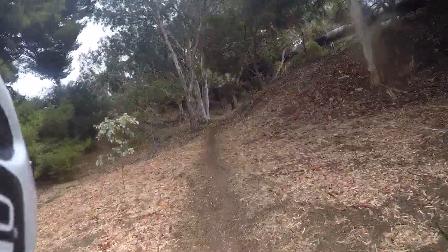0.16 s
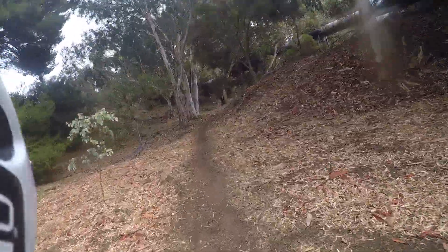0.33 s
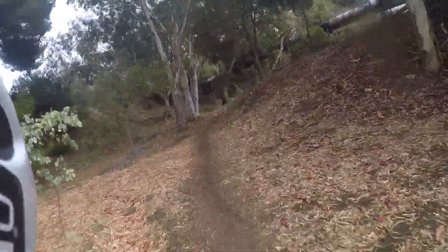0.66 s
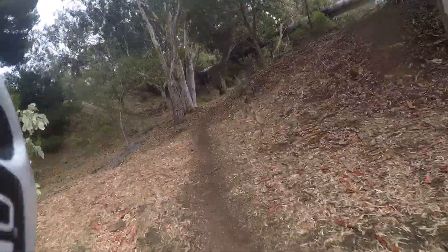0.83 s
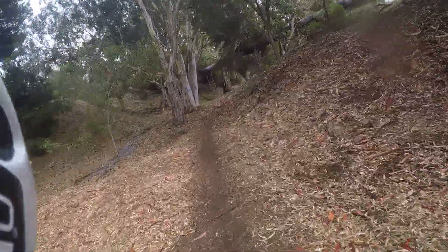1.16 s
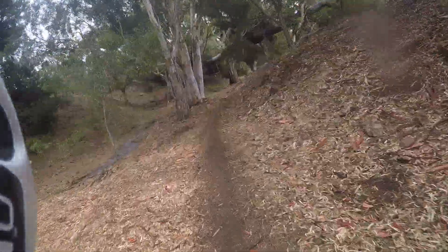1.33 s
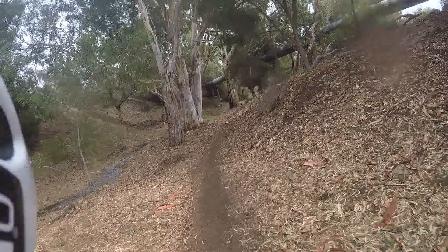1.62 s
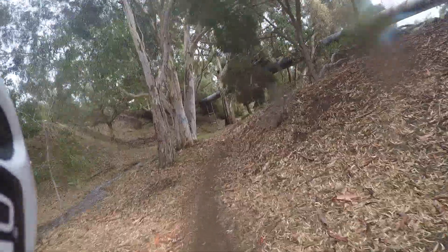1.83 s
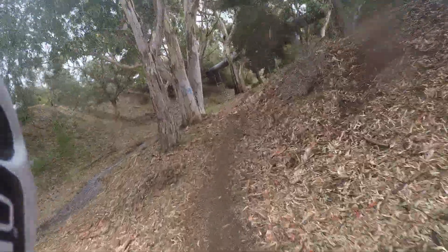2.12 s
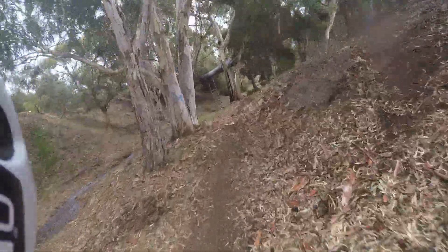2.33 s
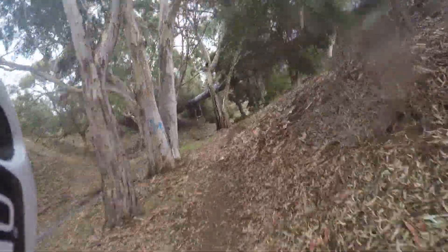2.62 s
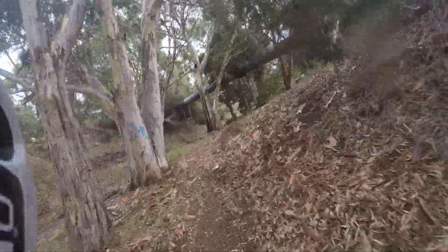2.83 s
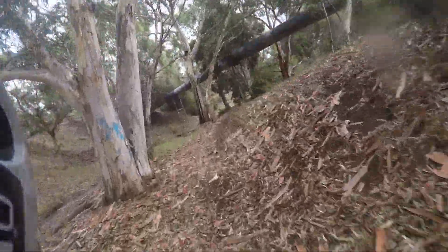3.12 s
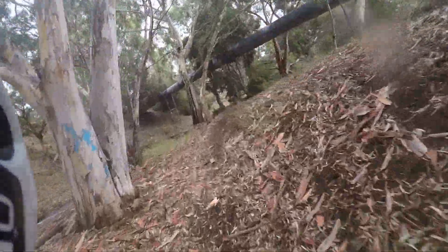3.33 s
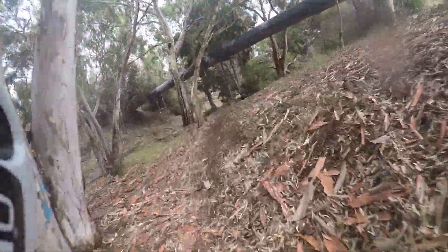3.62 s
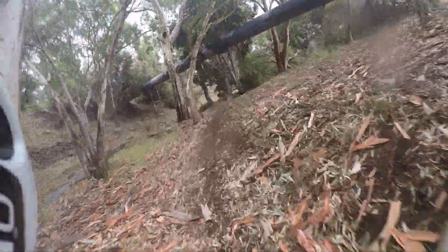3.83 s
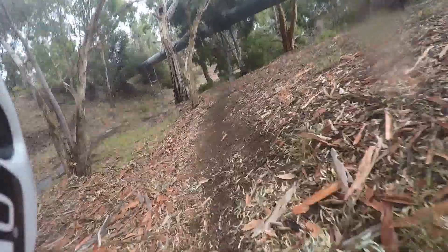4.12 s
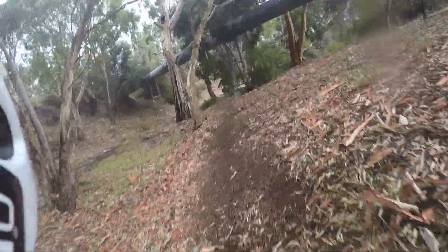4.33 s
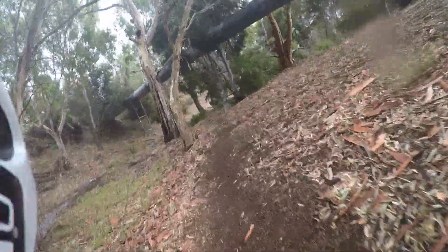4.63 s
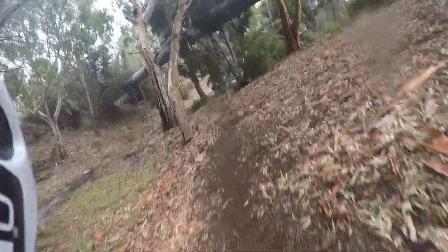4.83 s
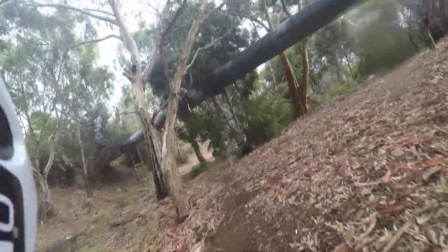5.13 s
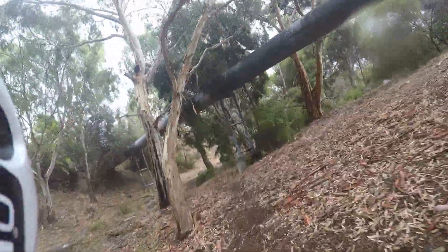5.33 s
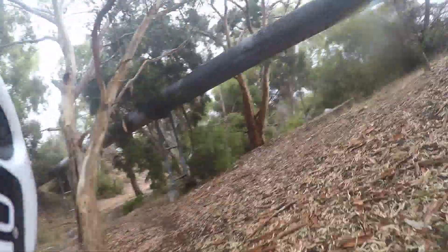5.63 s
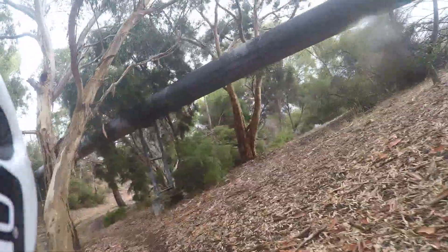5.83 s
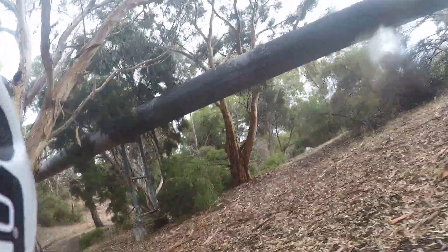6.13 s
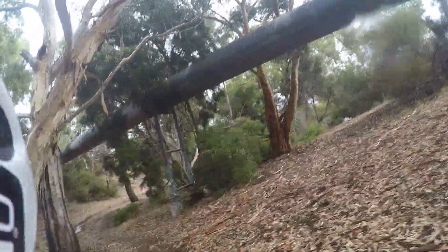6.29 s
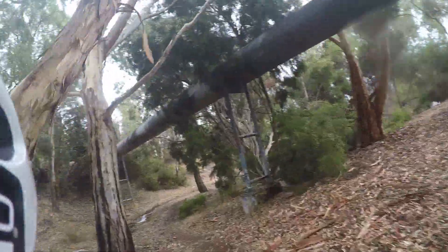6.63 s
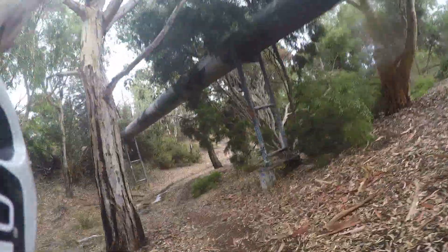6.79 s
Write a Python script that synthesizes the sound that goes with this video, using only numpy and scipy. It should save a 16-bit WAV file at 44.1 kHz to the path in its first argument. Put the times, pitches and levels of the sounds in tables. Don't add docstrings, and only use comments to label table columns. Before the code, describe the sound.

Close, muffled helmet microphone on a bicycle descending a leaf-covered dirt trail. Tyres crush dry leaves with a grainy, swelling hiss over low rumble; sticks knock and loose parts tick. A sharp bark snap with a brief metallic ring comes early. Wind buffeting grows to heavy thumps, then the crunch thins away, leaving wind, faint scuffs and distant birds. Small clicks recur steadily throughout.

```python
import sys
import numpy as np
from scipy import signal
from scipy.fft import rfft, irfft, next_fast_len
from scipy.io import wavfile
from scipy.ndimage import uniform_filter1d

SR = 44100
rng = np.random.default_rng(int(sys.argv[2]) if len(sys.argv) > 2 else 0)


def wrap_up_sound(samples):
    columns = np.atleast_2d(samples).T
    tamed = np.clip(columns, -1, 1)
    steps = np.round(tamed * 32767).astype(np.int16)
    wavfile.write(sys.argv[1], SR, steps)


def rack_gain(trim_db):
    fader = np.asarray(trim_db, float)
    return 10 ** (fader / 20)


N = 306931

# (frequency [Hz], bandwidth [Hz], level [dB])
HOUSING_MODES = [(830, 310, -20), (1178, 135, -6), (1458, 200, -9.5), (1850, 215, -1), (2517, 273, -2),
                 (2920, 174, 2), (3216, 346, -2), (3750, 290, -6.5), (4280, 290, -15.5)]
BRIGHT_MODES = [(5750, 420, 0.5), (6200, 75, -11), (6450, 58, -8.5), (7580, 340, -2.5), (9250, 1000, -17.5),
                (11500, 850, -14.5), (14500, 1800, -20.5)]

# (frequency [Hz], density [dB per Hz])
BUFFET_SPECTRUM = [(4.7, -10), (8.0, 2), (22, 1), (40, -11.5), (52, -31), (88, -120)]
FLUTTER_SPECTRUM = [(25, -33), (38, 2), (46, 2.5), (56, 1.5), (63, -5), (72, -15.5), (85, -29), (110, -69)]
# (time [s], buffeting level [dB])
AIRFLOW = [(0, -44), (.7, -41.5), (1.5, -37.5), (2.5, -37), (3.2, -33.5), (4.0, -32), (4.7, -26),
           (5.1, -35.5), (5.65, -26), (6.1, -36), (6.96, -38)]
# (time [s], peak buffeting [dB], peak flutter [dB])
GUSTS = [(.05, -53, -33), (0.237, -25.5, -30), (.4, -31, -55), (.57, -28.5, -40), (1.01, -55, -38.5),
         (1.3, -32, -38), (1.57, -50, -34), (1.68, -33, -48), (1.78, -31.5, -35.5), (1.92, -28.5, -32.5),
         (2.11, -28, -45), (2.28, -56, -36.5), (2.7, -52, -38), (2.81, -25, -43), (2.94, -28, -32),
         (3.22, -50, -34), (3.39, -35, -32), (3.57, -29.5, -43), (3.83, -32, -36.5), (4.07, -31.5, -34),
         (4.19, -45, -36), (4.28, -21, -27), (4.48, -31, -40), (4.75, -33, -35), (4.89, -28, -37.5),
         (5.24, -31.5, -36.5), (5.32, -26.5, -43), (5.52, -27.5, -44), (5.85, -23.5, -37),
         (6.16, -32.5, -36.5), (6.33, -25.5, -32.5), (6.53, -33.5, -33.5), (6.72, -32.5, -37.5),
         (6.84, -31.5, -64)]
GUST_RISE_DB_PER_S, GUST_FALL_DB_PER_S = 136, 113
FLUTTER_DB, FLUTTER_FOLLOWS = -45.5, 0.63
# (time [s], peak level [dB], pitch [Hz])
EDDIES = [(0.614, -21.5, 31.2), (4.076, -14, 32.2), (4.158, -22, 36.3), (4.473, -15.5, 35),
          (4.547, -27, 30), (4.616, -24, 32.3), (4.723, -15.5, 29.4), (4.836, -18.5, 30)]
EDDY_CYCLES = 0.54

# (frequency [Hz], density [dB per Hz])
DEEP_SPECTRUM = [(50, -39), (85, -0.5), (107, -5), (280, -20), (360, -69), (620, -120)]
GRIT_SPECTRUM = [(150, -3.5), (260, -2), (494, -5.5), (674, -8), (794, -4), (1000, -11.5), (1300, -31),
                 (2200, -120)]
# (time [s], deep rumble level [dB])
ROLLING = [(0, -54), (.6, -53), (1.05, -53), (1.32, -53.5), (1.75, -52), (2.4, -51), (2.85, -54.5),
           (3.3, -55.5), (5.0, -63.5), (5.6, -65), (6.2, -61.5), (6.6, -64.5), (6.96, -68)]
GRIT_DB, GRIT_FOLLOWS = -61.5, 0.71
# (time [s], peak rumble level [dB])
JOLTS = [(.44, -48), (.66, -50), (.81, -56), (1.22, -50), (1.3, -48.5), (1.86, -48), (1.98, -59),
         (2.15, -49), (2.3, -49), (2.53, -59), (2.62, -53), (2.74, -44.5), (2.84, -48), (2.92, -61),
         (3.1, -48), (3.6, -53), (4.02, -52), (4.24, -50), (4.6, -64), (4.84, -59), (5.15, -60),
         (5.32, -58), (5.78, -63), (5.95, -60), (6.64, -60), (6.79, -65)]
JOLT_RISE_DB_PER_S, JOLT_FALL_DB_PER_S = 400, 204
# (time [s], crush hiss level [dB])
LITTER = [(0, -49), (.4, -48), (.62, -47), (.78, -46), (1.05, -43), (1.58, -42), (1.66, -46), (1.93, -48.5),
          (2.05, -42), (2.27, -40.5), (2.79, -45), (2.86, -47.5), (3.26, -51), (3.42, -44.5), (4.12, -49),
          (4.65, -57.5), (5.7, -71.5), (6.96, -71)]
# (time [s], change [dB])
PATCHES = [(.11, 1.5), (.16, 2), (.25, -1.5), (.42, -5.5), (.46, 5), (.53, 1), (0.599, 8), (.615, -6.5),
           (.68, 5), (.8, -7), (.875, -1.5), (1.05, 2), (1.1, -1), (1.19, 2.5), (1.225, -4), (1.255, 2),
           (1.39, 1.5), (1.45, -0.5), (1.64, -6), (1.69, 2), (1.75, 2), (1.79, -5.5), (1.82, 1),
           (2.01, -4.5), (2.14, 1), (2.21, 2), (2.27, 1.5), (2.665, 3), (2.7, -0.5), (2.79, 2),
           (2.84, -4.5), (2.96, 3.5), (3.03, 2.5), (3.14, 7), (3.21, 2), (3.25, 0), (3.3, -6), (3.39, -4),
           (3.46, 4), (3.76, 2), (3.79, -2), (3.83, 0.5), (3.88, -3), (4.15, -1), (4.2, -3), (4.35, 2),
           (4.62, -3.5), (4.71, 6.5), (4.81, 2), (4.91, 3), (4.98, 8), (5.04, -16), (5.27, 6.5), (5.62, 5),
           (5.94, -3), (6.02, 9), (6.37, 10), (6.42, 7), (6.66, 11), (6.87, 13)]
PATCH_S = 0.017
BRIGHTER_PER_DB, DULLEST_DB = 0.88, -49
# (time [s], level [dB])
RUSTLE = [(0, -71), (.5, -72.5), (1.2, -67), (1.7, -70), (2.2, -64.5), (3.3, -74), (3.55, -65), (3.85, -64),
          (4.3, -64.5), (4.9, -71.5), (6.96, -83)]
JINGLE_DB, JINGLE_RISE_DB_PER_S, JINGLE_FALL_DB_PER_S = -20, 400, 220

# (time [s], level [dB], centre frequency [Hz])
KNOCKS = [(.145, -31, 2500), (0.17, -30.5, 1800), (.193, -33, 1840), (0.219, -37, 2200),
          (0.278, -33.5, 2900), (0.313, -31.5, 2920), (.344, -33.5, 3000), (.412, -34, 2880),
          (.623, -28.5, 2500), (.644, -48, 3100), (0.669, -24, 1380), (0.807, -37, 2850),
          (0.884, -30.5, 2500), (1.24, -30, 2720), (1.784, -44, 2950), (1.875, -38, 1680),
          (1.992, -33, 1850), (2.018, -48, 2950), (2.087, -47, 2930), (2.376, -32, 3080),
          (2.668, -27.5, 2920), (2.74, -55, 2920), (2.752, -35, 2500), (2.878, -46, 2460),
          (3.117, -40, 3000), (3.175, -36, 1850), (3.304, -37.5, 2900), (3.377, -34, 2620),
          (3.4, -37, 2830), (3.426, -37, 2480), (3.459, -38, 2900), (3.744, -37, 2000), (3.98, -42, 2200),
          (4.13, -31, 3230), (4.262, -33, 1180), (4.31, -34, 1150), (4.59, -42, 2630), (4.826, -42, 1830),
          (5.063, -49, 1640), (5.373, -51, 1890), (5.658, -52, 2500), (5.768, -48, 2900),
          (5.797, -57, 3100), (6.111, -48, 2180), (6.349, -39, 1300), (6.523, -46, 1500),
          (6.564, -46, 1600)]
KNOCK_TOP_DB = -26
# (time [s], body level [dB], bright level [dB], tilt [dB per octave])
TICKS = [(0.048, -51, -53, 1), (.056, -43, -54, 1), (.082, -51, -51, 1), (.646, -58, -50, 1),
         (.68, -38, -30, 1), (.686, -36, -40, 1), (0.72, -26.5, -34, 9), (1.123, -54, -42.5, -3),
         (1.292, -67, -53, -1), (1.331, -50, -52.5, -1), (2.98, -60, -51, 1), (3.409, -47, -49, -3),
         (3.426, -53, -52, 7), (3.457, -55, -56, -4), (3.532, -55, -52, 2), (3.542, -40, -39, 3),
         (3.548, -55, -50, -3), (3.559, -49, -45, 1), (3.566, -41, -45, -4), (3.573, -50, -39.5, -1),
         (3.581, -51, -49, 6), (3.59, -55, -52, 1), (3.659, -57, -46, 1), (3.667, -42, -45, 2),
         (3.695, -55, -51, 1), (3.708, -38, -44, 2), (3.721, -59, -50, -1), (3.738, -53, -50, 1),
         (3.745, -43, -44, 4), (3.764, -53, -47, -4), (3.95, -38, -39, 3), (3.97, -55, -53, 1),
         (3.982, -55, -58, 3), (4.095, -37.5, -42.5, 1), (4.135, -56, -41, -2), (4.17, -55, -58, -3),
         (4.215, -55, -49, 5), (4.235, -58, -52, 2), (4.251, -55, -45, 2), (4.259, -45, -41, 4),
         (4.272, -56, -44, 2), (4.353, -51, -41.5, 2), (4.498, -53, -44, -4), (4.538, -58, -54, 1),
         (4.675, -63, -53, 1), (4.697, -51, -45, -1), (4.72, -63, -53, -6), (6.631, -70, -54, 3)]
TICK_HZ = 2500
# (time [s], level [dB])
BARK = [(.643, -72), (.648, -48), (.657, -46.5), (.669, -54), (0.672, -44), (.688, -43.5), (.697, -55.5),
        (.717, -48), (.721, -49), (.73, -59), (.75, -62), (.83, -86)]
# (frequency [Hz], density [dB per Hz])
BARK_SPECTRUM = [(410, -30), (1050, -16.5), (1400, -6.5), (2160, -16), (3360, -6.5), (5080, -30),
                 (5570, -33), (7500, -20), (8210, -26), (9800, -27), (15500, -39)]
# (time [s], length [s], start [Hz], end [Hz], level [dB])
SQUEAKS = [
    (.165, 0.086, 1840, 1777, -53),
    (.265, 0.061, 1870, 1900, -55),
    (.325, 0.055, 1863, 1896, -50),
    (1.805, 0.068, 1783, 1848, -47.5),
    (1.88, 0.023, 1850, 1950, -52),
]
# (time [s], level [dB])
SPOKE_WHIPS = [
    (0.6711, -33),
    (.7205, -44),
]
# (frequency [Hz], level [dB], decay by 60 dB [s])
SPOKE_MODES = [(1370, -0.5, 0.063), (2950, -21, .07), (3321, 1, 0.089), (3640, -6, .035), (3970, -5, 0.087),
               (4730, -13, .06), (5720, -9, .06), (7340, -10, 0.083), (7671, -9, 0.08), (9432, -14, 0.045)]
# (time [s], length [s], level [dB], centre frequency [Hz])
SCUFFS = [(4.263, 0.026, -48, 1390), (4.316, 0.037, -51.5, 1340), (4.501, 0.039, -58, 1350),
          (4.648, 0.059, -60.5, 1340), (5.726, 0.023, -55, 1100), (5.933, 0.016, -60.5, 1500),
          (6.008, .03, -66, 2200), (6.075, 0.01, -58, 2200), (6.088, 0.032, -50.5, 1850),
          (6.201, 0.036, -57, 1340)]
# (time [s], length [s], start [Hz], end [Hz], level [dB])
CHIRPS = [(2.89, .04, 6850, 6750, -67), (4.85, .02, 4450, 4750, -61), (4.868, .025, 4750, 4500, -66),
          (4.903, .035, 5400, 5050, -64), (5.53, 0.05, 5050, 5200, -71), (5.56, 0.057, 6900, 6700, -72),
          (5.752, .055, 4500, 4600, -68), (5.772, .022, 5700, 5800, -65), (5.778, 0.05, 5300, 5500, -64),
          (5.793, .022, 5900, 6850, -68), (5.812, .022, 6900, 6700, -66), (5.85, .085, 5350, 5150, -77),
          (5.925, .022, 5100, 5500, -70), (5.946, 0.028, 5500, 7000, -64), (5.968, .03, 7150, 7100, -65),
          (5.995, .012, 7000, 6600, -70), (6.01, .07, 6750, 6700, -78), (6.38, 0.022, 4600, 4850, -65),
          (6.425, .025, 4450, 4550, -70), (6.447, 0.02, 4700, 4730, -67), (6.776, .024, 4400, 4550, -63),
          (6.793, .02, 4550, 4850, -71), (6.81, .03, 5440, 5500, -72), (6.855, .045, 5500, 5350, -67),
          (6.855, .025, 4650, 4650, -68), (6.912, .03, 4600, 4800, -71), (6.927, .032, 5450, 5550, -69)]
# (frequency [Hz], density [dB per Hz])
HISS_SPECTRUM = [(530, -40), (900, -20), (1160, 6.5), (1320, 0.5), (1880, 1.5), (2170, -6), (2570, 0),
                 (5100, -8.5), (13000, -18.5), (16000, -12)]
HISS_DB = -62.5

LOSS_EVERY_S, RESTART_EVERY_S, RESTART_AT_S = .125147, 3.3373, 1.1244
JUMPS_DB = [-30, -43.5, -35.5, -70, -27, -47.5, -39, -48.5, -70, -70, -30.5, -70, -42, -40.5, -47.5, -33,
            -43.5, -31, -42.5, -36, -34, -47, -27.5, -37.5, -34, -40.5, -32, -24.5, -38.5, -28.5, -33.5,
            -70, -23, -31, -32.5, -41, -19.5, -28, -41, -16.5, -33.5, -30.5, -31, -32, -31, -43, -36, -26.5,
            -33, -33.5, -30, -34, -32, -32.5, -70, -28]
# (time [s], length [s], lowest loss [Hz])
TREBLE_LOSSES = [(.22, .03, 12800), (.3, .2, 14300), (1.35, .2, 14300), (4.04, .05, 12800),
                 (4.27, .04, 13500), (4.45, .03, 14000), (4.53, .05, 13000), (4.6, .09, 12800),
                 (4.85, .1, 13000), (4.98, .06, 12800), (5.15, .18, 12800), (5.39, .04, 13200),
                 (5.49, .33, 12800), (5.92, .04, 13500), (6.06, .03, 13000), (6.18, .03, 13000),
                 (6.27, .1, 12800), (6.47, .13, 12800), (6.68, .04, 13000), (6.8, .04, 12800),
                 (6.93, .03, 13500)]


def wind():
    buffet_db, flutter_db = wind_levels()
    buffet = coloured(BUFFET_SPECTRUM, .85, over_s=.07)
    flutter = coloured(FLUTTER_SPECTRUM, .8, over_s=.06)
    pressure = rack_gain(buffet_db) * buffet + rack_gain(flutter_db) * flutter + eddies()
    return .3 * np.tanh(pressure / .3)


def wind_levels():
    flow_db, = in_time(AIRFLOW)
    deep_db, = in_time(ROLLING)
    s, buffet_db, flutter_db = np.transpose(GUSTS)
    steady_db = FLUTTER_DB + FLUTTER_FOLLOWS * (deep_db - deep_db.mean())
    rates = GUST_RISE_DB_PER_S, GUST_FALL_DB_PER_S
    buffeting = flares(flow_db, s, buffet_db + 2.0, *rates)
    fluttering = flares(steady_db, s, flutter_db + 1, *rates)
    rounding = int(.025 * SR)
    return uniform_filter1d(buffeting, rounding), uniform_filter1d(fluttering, rounding)


def eddies():
    out = np.zeros(N)
    for s, db, hz in EDDIES:
        near = np.arange(int((s - .08) * SR), int((s + .08) * SR))
        turns = (near / SR - s) * hz
        out[near] -= rack_gain(db) * np.exp(-(turns / EDDY_CYCLES) ** 2) * np.cos(2 * np.pi * turns)
    return out


def tyres():
    rumble = ground_rumble()
    clumps_db = 1.3 * drift(41.0)
    return rumble + litter_crush(clumps_db) + leaf_snaps(clumps_db)


def ground_rumble():
    deep_db, = in_time(ROLLING)
    grit_db = GRIT_DB + GRIT_FOLLOWS * (deep_db - deep_db.mean())
    jolted_db = flares(deep_db - 1.0, *np.transpose(JOLTS), JOLT_RISE_DB_PER_S, JOLT_FALL_DB_PER_S)
    deep = rack_gain(jolted_db + 0.57 * drift(7.4)) * coloured(DEEP_SPECTRUM, .6, over_s=.05)
    grit = rack_gain(grit_db + .9 * drift(25)) * coloured(GRIT_SPECTRUM)
    return deep + grit


def litter_crush(clumps_db):
    crush_db = crush_level()
    slope_db = BRIGHTER_PER_DB * np.maximum(crush_db - DULLEST_DB, 0) - 3.5
    tilts = [rack_gain(slope_db * np.log2(hz / 2300) + 0.99 * drift(40)) for hz, width, db in HOUSING_MODES]
    cracks = grains(8000, spread_db=2.5) * rack_gain(clumps_db)
    crush = rms_one(housing_wall(resonate(cracks, HOUSING_MODES, tilts)))
    return rack_gain(crush_db - 1.76) * crush


def leaf_snaps(clumps_db):
    s, body_db, bright_db, tilt_db = np.transpose(TICKS)
    rustle_db = in_time(RUSTLE)[0] + 0.94 * litter_patches()
    snap_db = flares(rustle_db, s, bright_db + JINGLE_DB, JINGLE_RISE_DB_PER_S, JINGLE_FALL_DB_PER_S)
    cracks = grains(2500, spread_db=2.0) * rack_gain(2.0 * clumps_db)
    snaps = rms_one(resonate(cracks, BRIGHT_MODES, np.ones(len(BRIGHT_MODES))))
    return rack_gain(np.minimum(snap_db, -55) - 3.0) * snaps


def crush_level():
    return in_time(LITTER)[0] + litter_patches()


def litter_patches():
    out = np.zeros(N)
    for s, db in PATCHES:
        near = np.arange(int((s - .06) * SR), int((s + .06) * SR))
        out[near] += db * np.exp(-((near / SR - s) / PATCH_S) ** 2)
    return out


def rattles():
    rows = [(s, db, db + KNOCK_TOP_DB, 0, hz) for s, db, hz in KNOCKS]
    rows += [(*row, TICK_HZ) for row in TICKS]
    s, body_db, bright_db, tilt_db, centre_hz = np.transpose(rows)
    mode_hz, _, mode_db = np.hsplit(np.array(HOUSING_MODES), 3)
    bright_hz = np.array(BRIGHT_MODES)[:, :1]

    knocks_db = body_db + 7.0 - 19 * np.log2(mode_hz / centre_hz) ** 2 - 0.46 * mode_db
    knocks_db = knocks_db + rng.normal(0, 1.8, (120, len(HOUSING_MODES)))[:len(s)].T
    ticks_db = bright_db + 9.0 + tilt_db * np.log2(bright_hz / 6500)
    ticks_db = ticks_db + rng.normal(0, 0.97, (120, len(BRIGHT_MODES)))[:len(s)].T

    knocks = flurries(s, HOUSING_MODES, knocks_db, t60=0.054, rise_s=0.002, strike=9.5)
    knocks = housing_wall(knocks)
    ticks = flurries(s, BRIGHT_MODES, ticks_db, t60=0.02, rise_s=0.00036, strike=1.5)
    return knocks + ticks


def flurries(s, modes, strengths_db, t60, rise_s, strike):
    at = (s * SR).astype(int)
    gains = np.zeros((len(modes), N))
    gains[:, at - 20] = rack_gain(strengths_db)
    gains = uniform_filter1d(gains, int(rise_s * SR))
    gains = signal.lfilter([1], [1, -rack_gain(-60 / (t60 * SR))], gains)
    contacts = rng.standard_normal(N)
    contacts[at] = strike
    return resonate(contacts, modes, gains)


def bark():
    s, db = np.transpose(BARK)
    level_db = np.interp(np.arange(N) / SR, s, db, -99, -99)
    crunch = rack_gain(level_db + 6.5 + 0.98 * drift(150)) * coloured(BARK_SPECTRUM)
    return crunch + rack_gain(11.5) * resonate(crunch, BRIGHT_MODES, np.ones(len(BRIGHT_MODES)))


def pebbles():
    hits = grains(150, spread_db=0.7)
    dealt = rng.integers(0, len(HOUSING_MODES), N)
    pings = resonate(hits, HOUSING_MODES, [dealt == k for k in range(len(HOUSING_MODES))])
    return rack_gain(0.57 * crush_level() - 31.0) * rms_one(housing_wall(pings))


def brake():
    return whistles(SQUEAKS, overtone_db=-4, waver_db=5.5, arch=0.0018)


def spoke():
    out = np.zeros(N)
    s, db = np.transpose(SPOKE_WHIPS)
    for hz, level_db, t60 in SPOKE_MODES:
        clicks = np.zeros(N)
        clicks[(s * SR).astype(int)] = rack_gain(db + level_db) * rng.choice([-1, 1], len(s))
        r, w = rack_gain(-60 / (t60 * SR)), 2 * np.pi * hz / SR
        out += signal.lfilter([0, np.sin(w)], [1, -2 * r * np.cos(w), r * r], clicks + 1e-18)
    return out


def scuffs():
    levels = np.zeros((len(HOUSING_MODES), N))
    hz, width_hz, mode_db = np.transpose(HOUSING_MODES)
    for s, length, db, centre_hz in SCUFFS:
        mode_level_db = db + 12.5 - 10.0 * np.log2(hz / centre_hz) ** 2 - 0.94 * mode_db
        levels[:, int(s * SR):int((s + length) * SR)] = rack_gain(mode_level_db)[:, None]
    rubbing = rng.standard_normal(N) * rack_gain(4.5 * drift(120))
    return housing_wall(resonate(rubbing, HOUSING_MODES, uniform_filter1d(levels, size=200)))


def birds():
    calls = whistles(CHIRPS, overtone_db=-40, waver_db=3.3, arch=.018)
    lags_s = rng.uniform(.01, .09, 5)
    return calls + sum(rack_gain(-17 - 80 * lag) * np.roll(calls, int(lag * SR)) for lag in lags_s)


def hiss():
    return rack_gain(HISS_DB) * coloured(HISS_SPECTRUM)


def housing_wall(x):
    return signal.sosfilt(signal.butter(4, 4500, fs=SR, output="sos"), x)


def resonate(x, modes, gains):
    out = np.zeros(N)
    for k, ((hz, width_hz, db), gain) in enumerate(zip(modes, gains)):
        r = np.exp(-np.pi * width_hz / SR)
        feed = [(1 - r * r) / 2, 0, (r * r - 1) / 2]
        feedback = [1, -2 * r * np.cos(2 * np.pi * hz / SR), r * r]
        out += (-1) ** k * rack_gain(db) * signal.lfilter(feed, feedback, x * gain + 1e-18)
    return out


def whistles(notes, overtone_db, waver_db, arch):
    out = np.zeros(N + SR)
    wobble = .5 * arch * drift(70)
    for s, length, start_hz, end_hz, db in notes:
        start = int(s * SR)
        u = np.linspace(0, 1, int(length * SR))
        bend = 1 + arch * np.sin(np.pi * u) + wobble[start:][:len(u)]
        hz = (start_hz + (end_hz - start_hz) * u) * bend
        phase = 2 * np.pi * np.cumsum(hz) / SR
        tone = np.sin(phase) + rack_gain(overtone_db) * np.sin(2 * phase)
        out[start:start + len(u)] += rack_gain(db - 1.5) * np.sin(np.pi * u) ** 0.24 * tone
    return out[:N] * rack_gain(waver_db * drift(130))


def grains(per_s, spread_db):
    sizes = rack_gain(spread_db * np.minimum(rng.exponential(1, N), 4)) * rng.choice([-1, 1], N)
    return rms_one(sizes * (rng.random(N) < per_s / SR))


def coloured(spectrum, evenness=0., over_s=.1):
    hz, db = np.transpose(spectrum)
    size = next_fast_len(N)
    f = np.arange(size // 2 + 1) * SR / size + 1e-3
    shape = rack_gain(np.interp(np.log(f), np.log(hz), db, -99, -99))
    x = irfft(rfft(rng.standard_normal(size)) * shape, size)[:N]
    width = int(over_s * SR)
    swell = uniform_filter1d(uniform_filter1d(x ** 2, width), width)
    return rms_one(x / (swell + 1e-20) ** (evenness / 2))


def flares(steady_db, s, peak_db, rise, fall):
    power = rack_gain(2 * steady_db)
    for at, db in zip(s, peak_db):
        near = np.arange(max(int((at - .4) * SR), 0), min(int((at + .4) * SR), N))
        late = near / SR - at
        power[near] += rack_gain(2 * (db - np.where(late < 0, -rise * late, fall * late)))
    return 10 * np.log10(power)


def drift(rate):
    r = np.exp(-2 * np.pi * rate / SR)
    x = signal.lfilter([1], [1, -2 * r, r * r], rng.standard_normal(N + 9000))
    return rms_one(x[9000:])


def in_time(rows):
    s, *columns = np.transpose(rows)
    return [np.interp(np.arange(N) / SR, s, c) for c in columns]


def rms_one(x):
    return x / np.sqrt(np.mean(x ** 2) + 1e-20)


def scene():
    bicycle = tyres() + bark() + rattles() + pebbles() + brake() + spoke()
    return (wind() + bicycle + birds() + hiss() + scuffs())[None]


def treble_dropouts(x):
    lowest_hz = np.full(N, 14800)
    for s, length, hz in TREBLE_LOSSES:
        lowest_hz[int(s * SR):int((s + length) * SR)] = hz
    together = drift(80)
    size = next_fast_len(N)
    spectrum, f = rfft(x, size), np.arange(size // 2 + 1) * SR / size
    for low_hz in np.arange(12700, 15700, 400):
        band = irfft(spectrum * ((f >= low_hz) & (f < low_hz + 400)), size)[:, :N]
        chance = .8 * together + .6 * drift(40)
        lost = (low_hz + 250 > lowest_hz) & (chance < (low_hz - lowest_hz) / 1500 - .1)
        x = x - band * uniform_filter1d(lost * 1., 200)
    return x


def lost_samples():
    restarts = RESTART_AT_S + RESTART_EVERY_S * np.arange(-1, 2)
    s = (restarts[:, None] + LOSS_EVERY_S * np.arange(27)).ravel()
    return np.round(s[(s > 0) & (s < N / SR)] * SR).astype(int)


def loss_spikes(dry):
    at = lost_samples()
    spikes = np.zeros(N)
    spikes[at] = -np.sign(dry[0, at]) * rack_gain(JUMPS_DB)
    return np.convolve(spikes, signal.firwin(61, 16000, fs=SR), "same")


def top_cut(x):
    return signal.sosfilt(signal.butter(12, 16820, fs=SR, output="sos"), x)


def record(dry):
    low_pass = signal.cheby2(16, 70, 15700, fs=SR, output="sos")
    mix = signal.sosfilt(low_pass, treble_dropouts(dry)) + loss_spikes(dry)
    return top_cut(mix)


dry = scene()
out = record(dry)
wrap_up_sound(out)
```